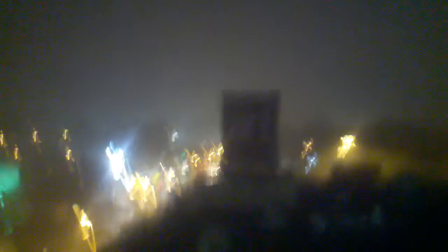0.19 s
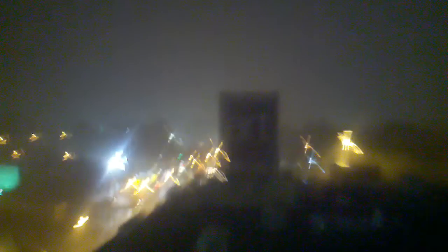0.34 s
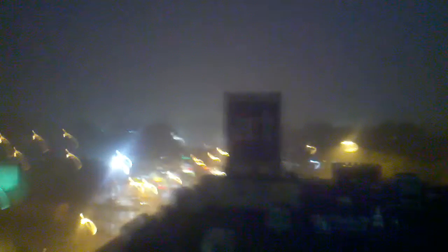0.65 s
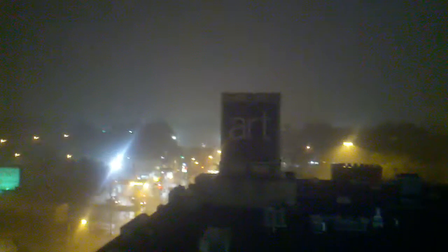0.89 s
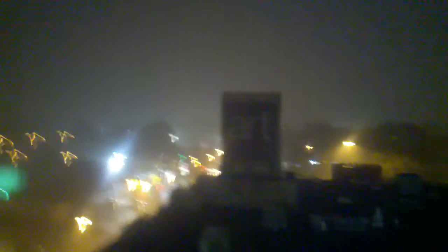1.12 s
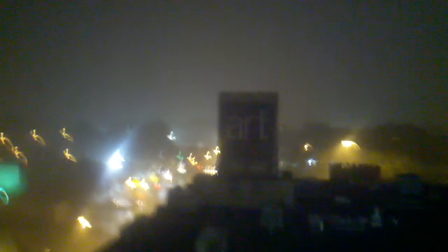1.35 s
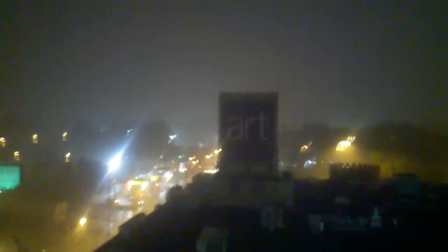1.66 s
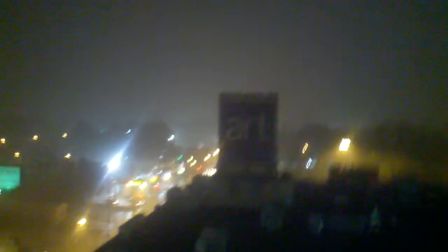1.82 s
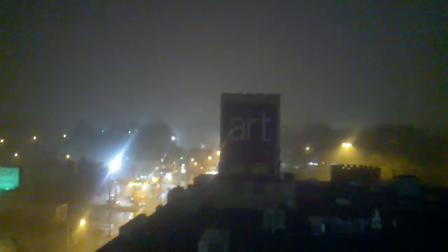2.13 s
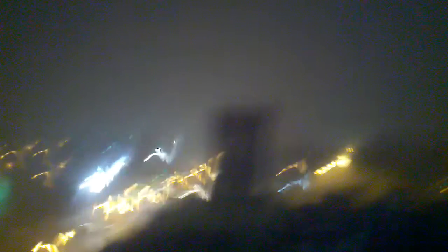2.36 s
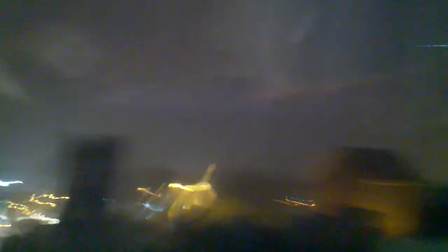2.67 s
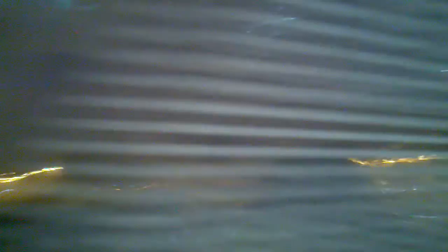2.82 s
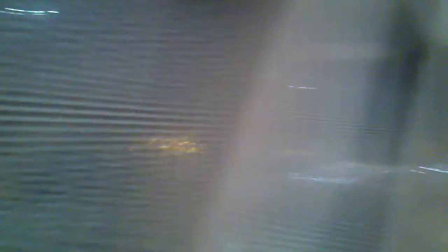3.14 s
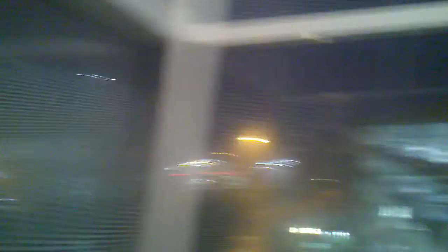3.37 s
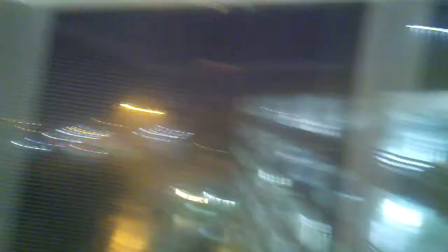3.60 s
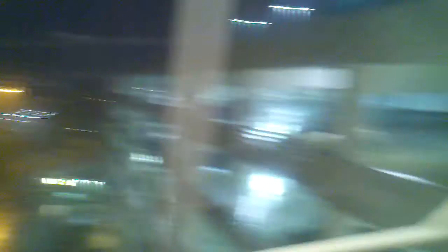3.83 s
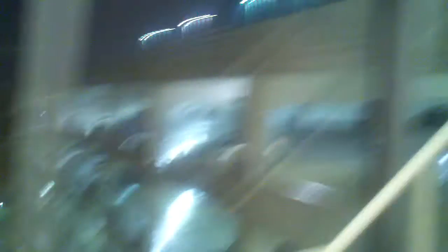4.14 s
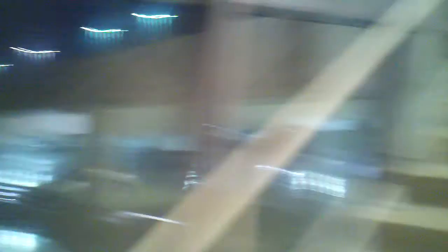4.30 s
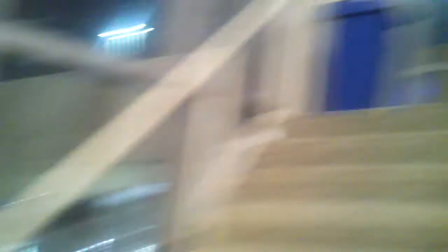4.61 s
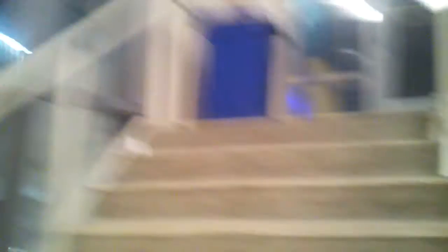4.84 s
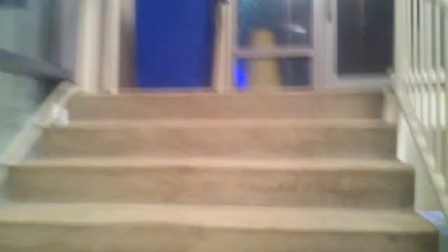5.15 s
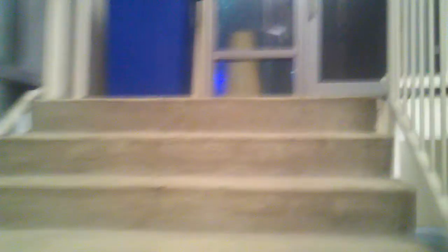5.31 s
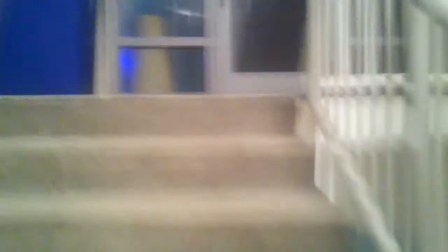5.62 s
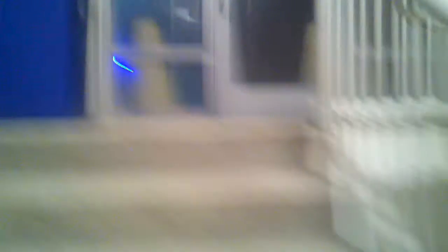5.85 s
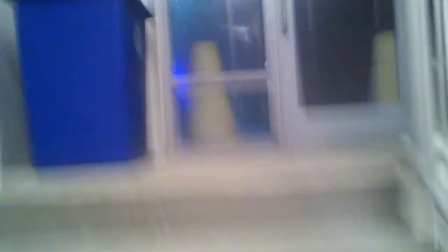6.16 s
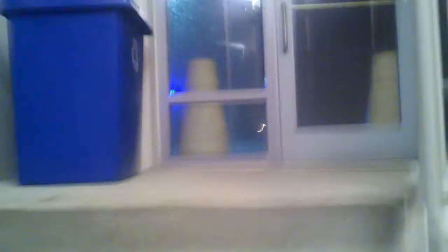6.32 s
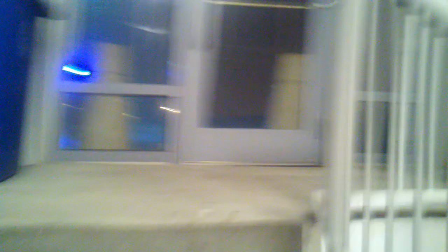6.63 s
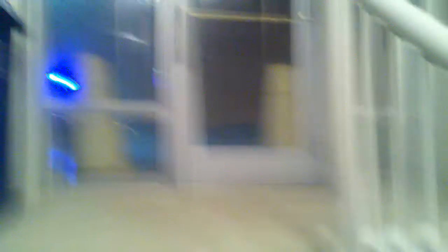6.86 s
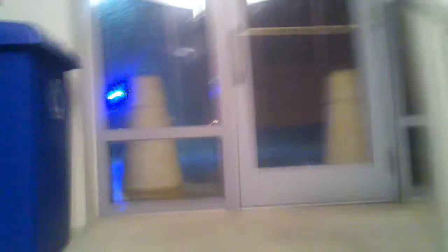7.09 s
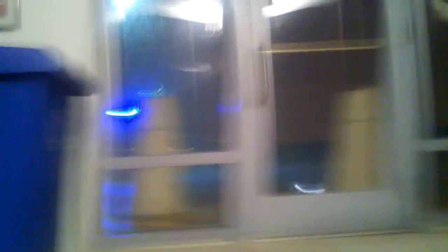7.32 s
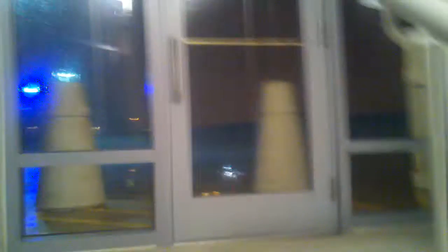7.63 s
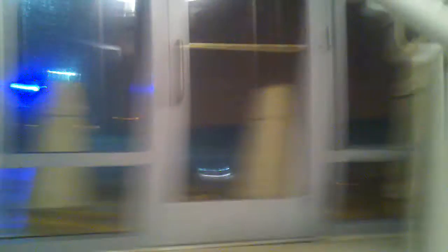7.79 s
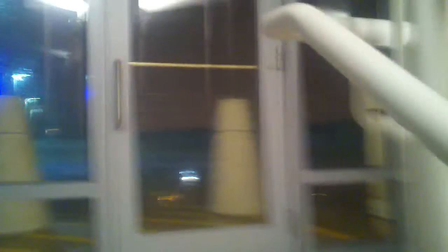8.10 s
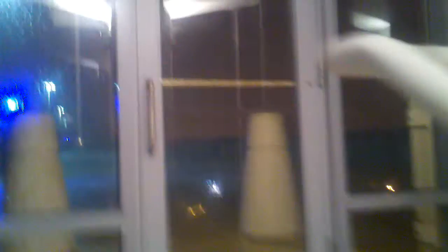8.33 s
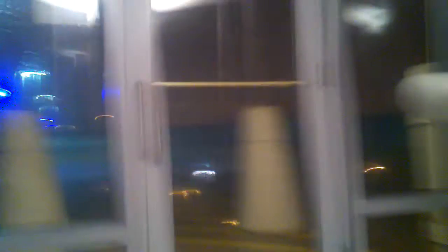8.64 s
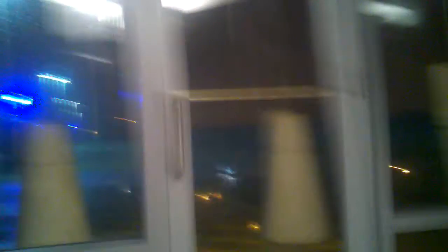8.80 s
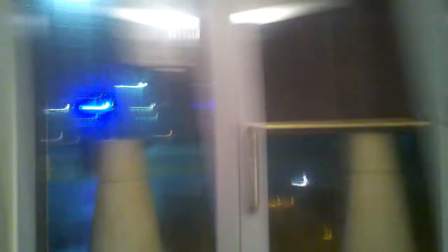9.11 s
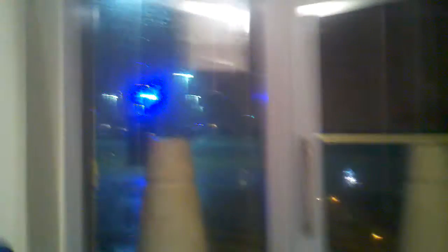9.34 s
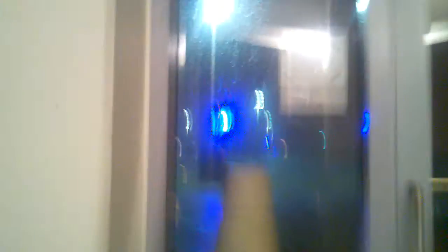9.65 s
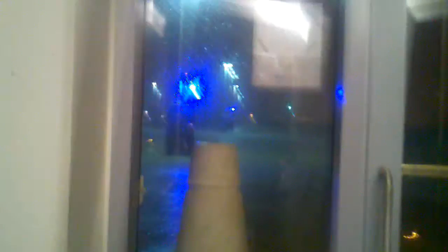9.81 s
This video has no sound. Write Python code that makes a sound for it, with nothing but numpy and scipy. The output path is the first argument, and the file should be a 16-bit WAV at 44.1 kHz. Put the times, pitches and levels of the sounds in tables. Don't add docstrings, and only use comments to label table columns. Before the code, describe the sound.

Hailstones crack and tick on a nearby pane over hissing rain, then the gusty downpour grows louder and denser, with only occasional soft drop slaps.

```python
import sys
import numpy as np
from scipy import signal
from scipy.fft import rfft, irfft, next_fast_len
from scipy.io import wavfile

SR = 44100
rng = np.random.default_rng(int(sys.argv[2]) if len(sys.argv) > 2 else 0)


def level_to_linear(level):
    exponent = np.asarray(level, float) / 20
    return 10 ** exponent


def file_out(sig):
    cols = np.atleast_2d(sig).T
    lim = np.clip(cols, -1, 1)
    pcm = np.round(lim * 32767).astype(np.int16)
    wavfile.write(sys.argv[1], SR, pcm)


N = 439662
HZ = np.fft.rfftfreq(next_fast_len(N), 1 / SR) + 1e-3
TOP_HZ = 13960

# time in seconds, downpour in dB,
# spray driven on the glass in dB.
STORM = [(0.0, -31.5, -0.5), (1.25, -31.5, 1.5), (1.53, -29, 0.5), (2.44, -26, -4), (3.11, -27, -0.5),
         (3.8, -23, -2.5), (4.53, -22, -1.5), (4.75, -24, -0.5), (5.3, -22, -0.5), (5.72, -25, 1),
         (6.03, -26, 2), (6.58, -22.5, -0.5), (7.39, -23, -0.5), (7.69, -22, 0.5), (9.02, -23.5, 1),
         (9.27, -25, 2), (9.97, -27, -1.5)]
# start in seconds, level in dB (below zero is a lull),
# length in seconds.
GUSTS = [(0.108, 2, 0.059), (.4, 1.5, 0.25), (0.766, 2, 0.18), (1.27, 4.5, 0.14), (1.108, -2.5, .06),
         (1.647, -1, 0.052), (1.91, 3.5, 0.072), (2.173, 3.5, 0.11), (2.362, -4, 0.097), (2.44, 0, .1),
         (2.754, 3.5, 0.089), (3.176, 0, 0.11), (4.16, -2, .12), (4.563, 5.5, 0.13), (5.013, 2, .15),
         (5.26, 2.5, 0.1), (5.497, 2, .12), (6.018, 4, .15), (6.497, 3, 0.068), (6.634, 2.5, 0.076),
         (6.95, 0.5, .12), (7.26, 1.5, .1), (7.474, -1.5, 0.069), (7.88, 1.5, 0.16), (8.102, -1, 0.12),
         (8.423, 2, 0.23), (8.8, -0.5, .08), (8.962, 1.5, 0.17), (9.414, 0.5, 0.073), (9.744, 3, 0.22)]
GUST_RISE_S, GUST_FALL_S = 0.016, 0.019
# pitch in Hz, then the shares (no unit) of the downpour,
# the spray and the gusts.
FOLLOW = [(130, 0.33, -.3, 0.21), (450, 1.01, 0, .05), (1800, 0.81, .3, .3), (3800, 1.18, .6, 0.44),
          (8000, 1.07, 1.05, 0.72)]
# pitch in Hz, level in dB per Hz.
WASH_COLOUR = [(30, -91), (60, -86.5), (100, -68), (250, -56.5), (400, -52), (750, -57.5), (1100, -62.5),
               (1650, -60.5), (1950, -57), (2500, -58.5), (3800, -68.5), (5200, -74), (7600, -67.5),
               (13000, -76.5), (13900, -81.5)]
# pitch in Hz, change beside the pane in dB,
# change at the upper door in dB.
PLACE = [(130, -1, 1), (282, -0.5, 2.5), (453, -1.5, -1), (614, 0, -1.5), (740, 5.5, 1.5), (880, -1, 0.5),
         (1240, 4, 0), (1700, -2, -0.5), (1980, -4.5, 1), (2950, -3.5, 0.5), (3480, 2.5, 3.5),
         (7500, -0.5, 1), (13000, -7, 3)]
# time in seconds, share beside the pane (0 to 1), share at the door (0 to 1).
STAIRS = [
    (0, 0.96, 0.02),
    (2.4, 0.7, 0.28),
    (3.5, 0.1, 0.2),
    (8.2, 0.05, 0.1),
    (8.7, 0.08, 0.4),
    (9.97, 0.18, 1.1),
]
DOOR_HZ, DOOR_WIDTH_HZ, DOOR_DB = 251, 9, -37
PORT_HZ, PORT_DB = 13300, -59

# pitch in Hz (0 is the crack, whose pitch follows the blow),
# width in Hz, delay in seconds, time to fall by 60 dB in seconds.
PANE = [
    (1800, 1700, .0009, .024),
    (3600, 1000, .0007, .016),
    (0, 6500, .0004, .010),
]
CRACK_HZ, CRACK_HZ_PER_DB = 11000, 110
RAIL_S, RAIL_HZ, RAIL_DB, RAIL_T60_S = 4.6856, 8900, -9, .012
# time in seconds, then the peaks of knock, ring and crack in dB.
SLAPS = [(0.0902, -26, -34, -29), (0.1354, -31, -37, -20), (0.1454, -34, -37, -30), (0.7791, -25, -36, -24),
         (0.7924, -32, -37, -36), (1.1773, -34, -32, -27), (1.3264, -26, -37, -25), (1.3513, -31, -28, -22),
         (1.665, -27, -33, -25), (1.6774, -34, -36, -35), (2.0726, -22, -33, -24), (2.462, -19, -34, -19),
         (2.4804, -33, -41, -31), (2.5564, -33, -37, -22), (2.715, -20, -39, -24), (2.74, -33, -41, -35),
         (4.6167, -25, -24, -32), (4.89, -28, -23, -26), (5.0754, -25, -37, -34), (5.31, -21, -28, -20),
         (6.0297, -29, -18, -19.5), (6.0464, -30, -27, -23), (6.6604, -34, -34, -24),
         (7.1644, -32, -23, -33)]
# time in seconds, then the peaks of knock, ring and crack in dB.
HAIL = [(0.1231, -17, -25, -16.5), (0.169, -24, -31, -22), (0.4072, -21, -20, -14.5),
        (0.4688, -19.5, -30, -33.5), (0.6184, -24, -48, -43), (0.6844, -27, -41, -40),
        (0.7607, -31, -34, -23), (0.88, -25, -32, -40), (0.9845, -21.5, -31, -41), (1.3643, -21, -24, -21),
        (1.4147, -23, -35, -39), (1.5405, -22, -36, -39), (1.557, -18.5, -32, -38.5),
        (1.5614, -31, -36, -37), (1.958, -27, -39, -15.5), (1.9624, -15, -27, -29),
        (1.9695, -19.5, -26.5, -27.5), (2.0145, -21.5, -17, -9), (2.3056, -20, -41, -16.5),
        (2.4464, -21, -25, -21), (2.8087, -25, -33, -20)]

COMB_HZ = 2604
PATCH_HZ, PATCH_S = 450, .026
# pitch in Hz, share of the time (0 to 1).
COMB_DEPTH = [(4150, 1.09), (4500, 0.65), (5200, 0.63), (6500, 0.3), (13400, .36)]
# pitch in Hz, likeness of the ports (-1 to 1).
BASS_LIKE = [(40, -.3), (100, 0.12), (250, 0.62), (450, 0.59), (800, 0.75), (1050, 0.97), (1300, 0.9)]
# pitch in Hz, share (-1 to 1).
LEAD = [(1300, -0.091), (2000, .45), (2700, 0), (4500, -.3), (8000, -.15), (13000, -.1)]
# pitch in Hz, level in dB.
RIGHT = [(60, 2), (125, 3.5), (250, 0.7), (600, 0.75), (8000, 0.8)]


def read(table, at, axis=1):
    table = np.transpose(table)
    return np.interp(np.log(at), np.log(table[0]), table[axis])


def flicker(rate, s, count=1):
    knots = rng.standard_normal((count, 1000))
    return np.array([1.2 * np.interp(s * rate, np.arange(1000), k) for k in knots])


def to_spectra(x):
    hz, s, z = signal.stft(x, SR, nperseg=1024, noverlap=768)
    return hz + 1e-3, s, z


def to_sound(z):
    return signal.istft(z, SR, nperseg=1024, noverlap=768)[1][:, :N]


def dull(x):
    return signal.sosfilt(signal.ellip(8, .3, 60, TOP_HZ, fs=SR, output="sos"), x)


def port_hiss():
    size = next_fast_len(N)
    noise = rfft(rng.standard_normal((2, N)), size)
    hiss = irfft(noise * (HZ > PORT_HZ) * (HZ < TOP_HZ), size)[:, :N]
    return level_to_linear(PORT_DB) * hiss / hiss.std()


def door():
    band = [DOOR_HZ - DOOR_WIDTH_HZ / 2, DOOR_HZ + DOOR_WIDTH_HZ / 2]
    sos = signal.butter(1, band, "bandpass", fs=SR, output="sos")
    hum = signal.sosfilt(sos, rng.standard_normal((2, N)))
    at, _, nearness = np.transpose(STAIRS)
    return level_to_linear(DOOR_DB) * hum / hum.std() * np.interp(np.arange(N) / SR, at, nearness)


def storm(s):
    at, pour_db, spray_db = np.transpose(STORM)
    gust_db = 0
    for start, db, hold in GUSTS:
        rise = np.clip((s - start) / GUST_RISE_S, 0, 1)
        fall = np.exp(-np.clip(s - start - hold, 0, 1e3) / GUST_FALL_S)
        gust_db = gust_db + db * rise * fall
    pour_db = np.interp(s, at, pour_db)
    return pour_db - pour_db.mean(), np.interp(s, at, spray_db), gust_db


def drops(per_s, spread_db):
    hits = (rng.random((2, N)) < per_s / SR) * level_to_linear(spread_db * rng.exponential(size=N))
    hits = hits * rng.choice([-1, 1], (2, N))
    return hits / hits.std()


def wash():
    size = next_fast_len(N)
    grain = level_to_linear(-9) * np.clip(HZ / 3000, 0, 1) * rfft(drops(2500, 1.8), size)
    blur = rfft(rng.standard_normal((2, N)), size)
    spectrum = (blur + grain) * level_to_linear(read(WASH_COLOUR, HZ)) * (HZ < TOP_HZ)
    hz, s, z = to_spectra(irfft(spectrum, size)[:, :N] * np.sqrt(SR / 2))
    db = sum(np.outer(read(FOLLOW, hz, axis=k + 1), level) for k, level in enumerate(storm(s)))
    db = db - 10 * np.log10(np.mean(level_to_linear(db) ** 2, axis=1, keepdims=True))
    for k in (1, 2):
        db = db + np.outer(read(PLACE, hz, axis=k), np.interp(s, *np.transpose(STAIRS)[[0, k]]))
    third_octave = np.clip(3 * np.log2(hz / 30), 0, 29).astype(int)
    own = flicker(12, s, count=30)[third_octave]
    db = db + np.clip(hz / 8000, .3, 1)[:, None] * (0.51 * flicker(15, s) + 0.87 * own)
    return to_sound(z * level_to_linear(db))


def rail():
    age = np.clip(np.arange(N) / SR - RAIL_S, 0, 1)
    ping = sum(np.sin(2 * np.pi * RAIL_HZ * share * age) for share in (.94, 1.04)) / 2
    fade = level_to_linear(RAIL_DB - 60 * age / RAIL_T60_S) * (1 - np.exp(-age / 0.00034))
    return fade * ping * np.array([[1], [.7]])


def blows(table, gain_db, stretch, rise_s, snap, tail_db=-14, tail_s=.09):
    out, t = np.zeros((2, N + 8192)), np.arange(8192) / SR
    for s, *part_db in table:
        for db, (hz, width, delay, t60) in zip(part_db, PANE):
            hz = hz or max(CRACK_HZ + CRACK_HZ_PER_DB * db, 7000)
            sos = signal.butter(2, [hz - width / 2, hz + width / 2], "bandpass", fs=SR, output="sos")
            age = np.clip(t - delay, 0, 1)
            fall = level_to_linear(-60 * age / (t60 * stretch))
            echo = level_to_linear(tail_db - 60 * age / tail_s)
            push = rng.standard_normal((2, len(t)))
            push[:, int(delay * SR) + 3] += snap
            push = push * (1 - np.exp(-age / rise_s))
            burst = signal.sosfilt(sos, push * fall + dull(push * echo))
            burst = burst / abs(burst).max(axis=1, keepdims=True)
            start = int(s * SR)
            out[:, start:start + len(t)] += level_to_linear(db + gain_db) * burst
    return out[:, :N]


def slaps():
    return blows(SLAPS, 0.67, stretch=8.3, rise_s=0.00074, snap=0)


def hail():
    return blows(HAIL, 6.1, stretch=1, rise_s=.00003, snap=1.4)


def scene():
    return port_hiss() + door() + wash() + dull(slaps() + rail()) + hail()


def band_limit(x):
    return signal.sosfilt(signal.butter(12, 14830, fs=SR, output="sos"), x)


def record(dry):
    hz, s, (a, b) = to_spectra(dry)
    turn = 2 * np.pi * hz[:, None] / COMB_HZ + 0.081 * flicker(25, s)
    patch = (hz / PATCH_HZ).astype(int)
    luck = 0.49 * flicker(1 / PATCH_S, s) + 1.2 * flicker(1 / PATCH_S, s, count=60)[patch]
    odds = read(COMB_DEPTH, hz)[:, None] - .5 - .5 * np.tanh(0.92 * luck)
    held = np.clip(.5 + 9.9 * odds, .05, 1)
    held = held * np.where(hz > 4400, .92, 1)[:, None]
    comb = np.sign(-np.cos(turn)) * abs(np.cos(turn)) ** 0.99
    bass = np.clip(read(BASS_LIKE, hz), -1, 1)[:, None]
    like = np.where(turn < np.pi, bass, comb) * held
    like = np.maximum(like, np.interp(hz, [13100, 13850], [-1, .88])[:, None])
    lead = np.clip(read(LEAD, hz)[:, None] * np.sin(turn), -1, 1)
    mid = np.sqrt((1 + like) / 2) * a
    side = np.sqrt((1 - like) / 2) * (1j * lead * a + np.sqrt(1 - lead ** 2) * b)
    lean = level_to_linear(read(RIGHT, hz) / 2)[:, None]
    top = np.where(hz > TOP_HZ, level_to_linear(-21), 1)[:, None]
    ports = to_sound(top * np.array([(mid + side) / lean, (mid - side) * lean]))
    return band_limit(ports)


dry = scene()
out = record(dry)
file_out(out)
```